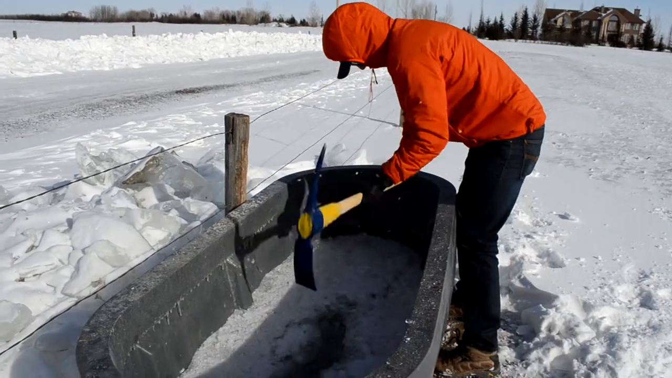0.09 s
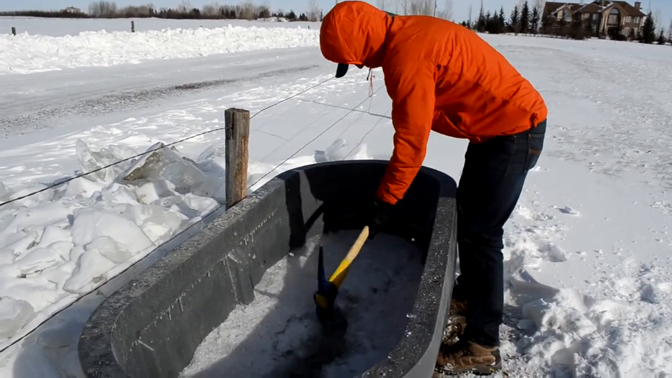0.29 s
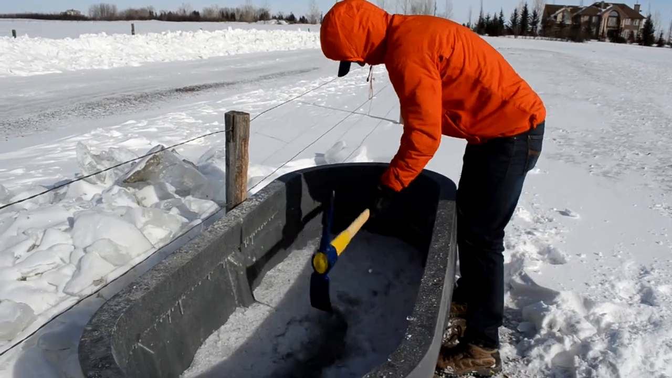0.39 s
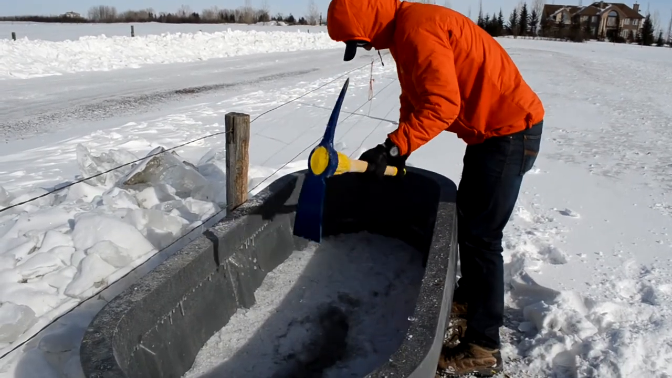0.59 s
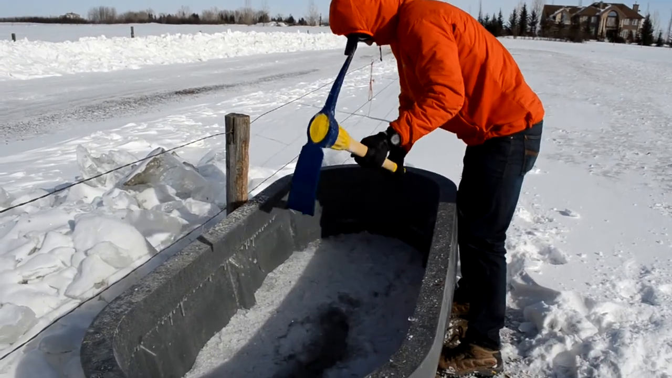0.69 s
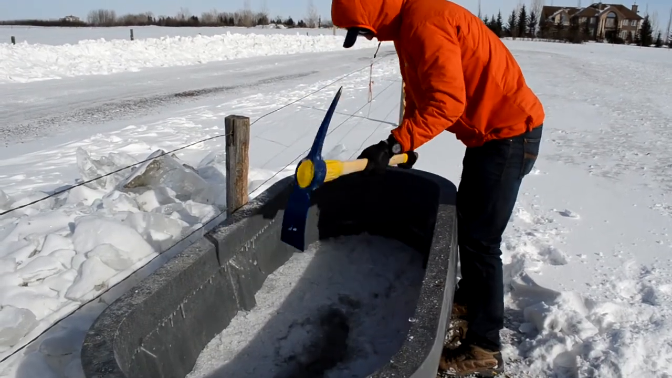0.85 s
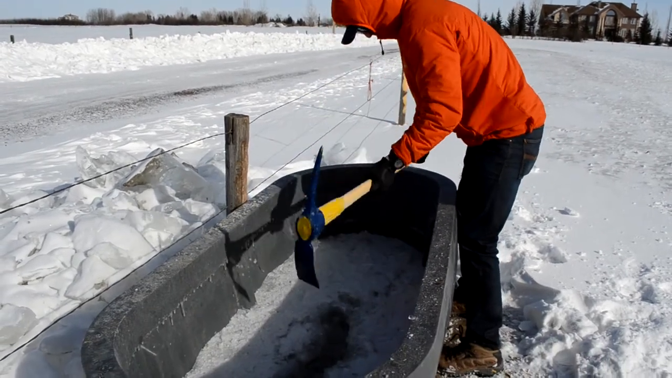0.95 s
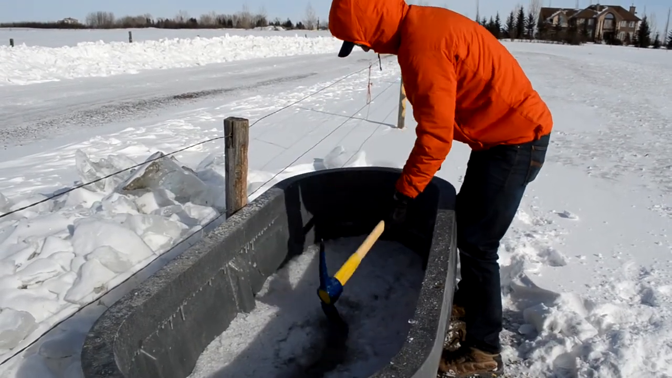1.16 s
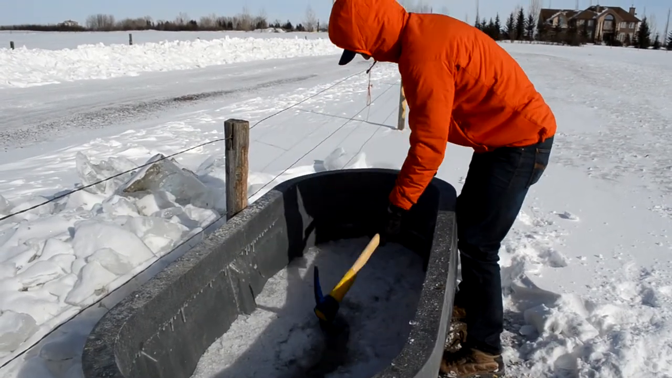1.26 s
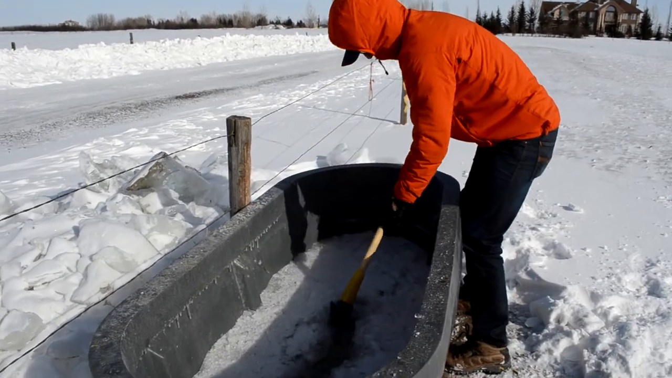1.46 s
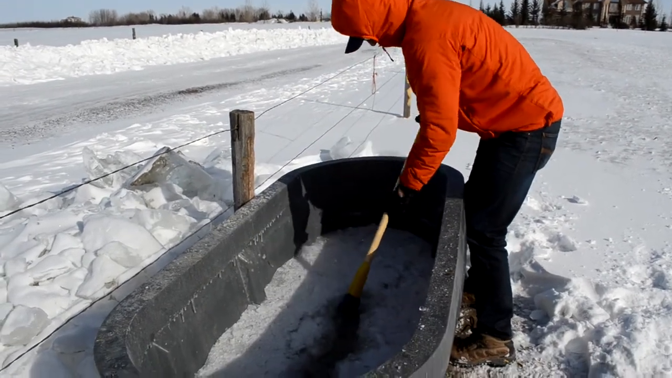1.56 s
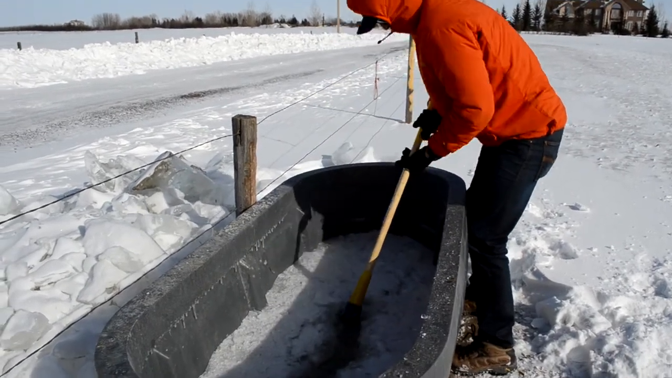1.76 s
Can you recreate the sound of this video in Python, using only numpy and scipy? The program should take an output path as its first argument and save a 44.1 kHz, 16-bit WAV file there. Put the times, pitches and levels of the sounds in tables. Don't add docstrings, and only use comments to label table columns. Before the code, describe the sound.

Pickaxe blows crunch into ice in a plastic trough outdoors, chips scattering over faint wind

```python
import sys
import numpy as np
from scipy import signal
from scipy.fft import rfft, irfft
from scipy.io import wavfile
from scipy.ndimage import uniform_filter1d

SR = 44100
rng = np.random.default_rng(int(sys.argv[2]) if len(sys.argv) > 2 else 0)


def elevation(decibels):
    levels = np.asarray(decibels, float)
    return 10 ** (levels / 20)


def persist_wave(psi):
    counts = np.round(np.clip(psi, -1, 1) * 32767).astype(np.int16)
    wavfile.write(sys.argv[1], SR, np.atleast_2d(counts).T)


N = 79380

# [f/Hz, level/dB, t60/s]
SLABS = [
    [(283, -7.5, 0.13), (515, -11, 0.11), (700, -20, 0.057), (1390, 5.5, 0.016), (1582, 0, 0.061),
     (2090, -14, 0.0077), (2554, 1.5, 0.016)],
    [(252, 12.5, 0.036), (387, -8.5, 0.014), (636, -1, 0.043), (1017, 0, 0.06), (1450, 0, 0.036),
     (1860, -12, 0.044), (2400, -28, .04)],
    [(218, -6, 0.11), (1020, -32, 0.074), (1210, 7.5, 0.017), (1300, -6.5, 0.02), (1710, -41, 0.04),
     (2546, -11, 0.047), (3310, -12.5, 0.035), (4200, -19, 0.018)],
]
# [f/Hz, density/dB per Hz]
CRACK_SPECTRUM = [(420, -24), (600, 0), (1350, 3), (2600, -15), (4000, -22.5), (8000, -31.5), (15500, -63)]
# [f/Hz, density/dB per Hz]
TICK_SPECTRUM = [(1500, -38), (3300, -2), (5000, -1), (7000, 2.5), (10000, -7), (15500, -22)]
LEAD_S = 0.01


def level(x, db):
    return x * elevation(db) / np.sqrt(np.mean(x ** 2))


def colour(x, points):
    p = np.array(points, float)
    hz = np.arange(4097) * SR / 8192 + 1
    db = np.interp(np.log(hz), np.log(p[:, 0]), p[:, 1], left=p[0, 1] - 20)
    cepstrum = irfft(db * np.log(10) / 20)
    cepstrum[1:4096] *= 2
    cepstrum[4097:] = 0
    response = irfft(np.exp(rfft(cepstrum)))
    return signal.fftconvolve(x, response)[:len(x)]


def ring(x, hz, db, t60):
    radius = np.exp(-np.log(1000) / (max(t60, 0.002) * SR))
    angle = 2 * np.pi * hz / SR
    poles = [1, -2 * radius * np.cos(angle), radius * radius]
    return elevation(db) * signal.lfilter([radius / 2, 0, -radius / 2], poles, x)


def walk(rate):
    k = int(SR / rate)
    steps = np.repeat(rng.standard_normal(N // k + 1), k)
    wander = uniform_filter1d(uniform_filter1d(steps, k), k)[:N]
    return wander / wander.std()


def crush(rise, decay, spread_db, size=8192):
    t = np.arange(size) / SR - LEAD_S
    swell = np.exp(np.minimum(t, 0) / max(rise, 1e-4))
    fade = np.exp(-np.maximum(t, 0) / max(decay, 2e-4))
    uneven = elevation(spread_db * rng.exponential(size=size))
    x = rng.standard_normal(size) * uneven * np.where(t < 0, swell, fade)
    x[int(LEAD_S * SR)] += 1.77 * elevation(spread_db)
    return x


def soft(x, hz):
    blunt = signal.butter(3, min(hz, 9000), fs=SR, output="sos")
    no_push = signal.butter(2, 170, "high", fs=SR, output="sos")
    return signal.sosfilt(np.vstack([blunt, no_push]), x)


def slab_ring(push, slab):
    longest_s = 0.055
    return sum(ring(push, hz, db, min(t60, longest_s)) for hz, db, t60 in slab)


def add(out, s, x, db):
    i = int((s - LEAD_S) * SR)
    k = min(len(x), N - i)
    out[i:i + k] += x[:k] * elevation(db) / np.abs(x).max()


def wind():
    # [f/Hz, density/dB per Hz]
    rumble = [(12, -104), (20, -16), (97, 0.5), (189, -6.5), (315, -15), (341, -18), (381, -16), (440, -19),
              (900, -35), (1170, -36.5), (1980, -120)]
    # [t/s, level/dB]
    gust = [(0, -41), (.13, -37.5), (.3, -35), (.43, -35.5), (.75, -38.5), (.87, -31), (.93, -40),
            (1.02, -35.5), (1.15, -37), (1.58, -30.5), (1.8, -35.5)]
    # [f/Hz, density/dB per Hz]
    air = [(300, -12.5), (600, 16), (1500, -13), (3000, -11), (8000, -59), (15000, -52)]
    gust_s, gust_db = np.array(gust).T
    x = rng.standard_normal(N)
    puffs = level(colour(x * elevation(2.65 * walk(24.9)), rumble), 1.23)
    hiss = level(colour(rng.standard_normal(N), air), -64)
    return puffs * elevation(np.interp(np.arange(N) / SR, gust_s, gust_db)) + hiss


def slush():
    # [t/s, dull level/dB, bright level/dB]
    slide = [(0, -55, -62), (0.178, -50, -57), (.25, -71, -67), (.3, -46, -52.5), (0.368, -35, -46),
             (0.441, -49.5, -53.5), (.53, -50, -57.5), (.62, -54, -58), (.75, -52.5, -65),
             (1.152, -56, -67.5), (1.24, -42.5, -66), (1.361, -47, -60.5), (1.45, -39.5, -53.5),
             (1.52, -42, -62.5), (1.62, -47, -60), (1.682, -49, -56.5), (1.8, -50.5, -52)]
    # [f/Hz, density/dB per Hz]
    dull = [(300, -20), (600, 9), (1000, 5), (1450, 8.5), (2500, -2), (5000, -34.5)]
    # [f/Hz, density/dB per Hz]
    bright = [(1500, 7.5), (3300, 7), (5000, -2), (7000, -5), (11000, -15), (15500, -24)]
    crumbs_per_s, rattle_db = 3100, 2.2
    t, out = np.arange(N) / SR, 0
    slide_s, dull_db, bright_db = np.array(slide).T
    rattle = walk(220)
    for spectrum, db, patchy_db in ((dull, dull_db, 2.0), (bright, bright_db, 1.5)):
        hit = rng.random(N) < crumbs_per_s / SR
        grains = hit * elevation(2.2 * rng.exponential(size=N)) + 0.84
        x = rng.standard_normal(N) * grains
        flow_db = np.interp(t, slide_s, db) + patchy_db * walk(39.22) + rattle_db * rattle
        out = out + level(colour(x, spectrum), 0) * elevation(flow_db)
    return out


def scrapes():
    # [t/s, length/s, level/dB]
    drags = [
        (1.491, 0.026, -26.5),
        (1.599, 0.026, -35.5),
    ]
    t, swell = np.arange(N) / SR, 0
    x = soft(rng.standard_normal(N) * elevation(3 * walk(200)), 2200)
    plate = level(ring(x, 1420, 0, 0.025) + ring(x, 860, 0, 0.023), 0)
    for s, length, db in drags:
        u = (t - s) / length
        rise = np.clip(np.minimum(0.4 + 0.6 * u, 1), 0, 1) * (u > 0)
        swell = swell + elevation(db) * rise * np.exp(-np.maximum(u - 1, 0) * 5)
    return plate * swell


def pieces(rows, t60, trough_db, crunch_db):
    # [f/Hz, level/dB, t60/s]
    trough = [(243, 4, 0.023), (614, -10.5, 0.058), (1400, 0, 0.007)]
    small_hz = 2100
    out = np.zeros(N)
    for s, db, hz, treble_db, tumble in rows:
        x = crush(0.00028, tumble, 0.73, size=4096)
        push = soft(x, 1.39 * hz)
        own = ring(push, hz, 0, t60 * min(1, small_hz / hz) ** 2 * max(1, 1100 / hz))
        overtone_db = -6 - 40 * (hz > small_hz)
        own = own + ring(push, rng.uniform(2.05, 2.3) * hz, overtone_db, t60 * 600 / hz)
        walls = sum(ring(push, *mode) for mode in trough)
        add(out, s, own + elevation(trough_db) * walls, db)
        crunch = soft(soft(x, 2.2 * hz), 2.2 * hz)
        add(out, s, ring(crunch, 1.206 * hz, 0, 0.002), db + crunch_db)
        add(out, s, colour(x, TICK_SPECTRUM), db + treble_db - 4.5)
    return out


def chips():
    # [t/s, level/dB, f/Hz, treble/dB]
    ticks = [(0.0133, -46, 760, -14), (0.029, -43.5, 1040, 4), (0.045, -41.5, 1220, 1),
             (0.0706, -44.5, 680, 9.5), (0.0849, -44, 845, -18), (0.1185, -53, 662, -21),
             (0.135, -37, 1520, -2.5), (0.1727, -31, 1640, -4), (0.3249, -28.5, 786, -7),
             (0.3321, -36, 1420, 0), (0.3752, -28.5, 880, -13), (0.4111, -33, 1150, -6),
             (0.419, -32.5, 1280, -3), (0.4316, -37, 1400, -4), (0.4392, -36, 1260, -5),
             (0.5545, -38, 1180, 2.5), (0.59, -39.5, 1660, 1.5), (0.655, -46, 1400, -25),
             (0.695, -39, 1580, -38), (0.7824, -34, 797, -10.5), (1.0888, -40.5, 820, -16),
             (1.2608, -35, 1510, -29), (1.272, -38.5, 2300, -21), (1.342, -36, 2360, -22),
             (1.3286, -33, 1100, -38), (1.3774, -35.5, 770, -10.5), (1.7295, -34.5, 646, -17)]
    tumble_s = 0.002
    return pieces([(*row, tumble_s) for row in ticks], 0.0082, -9.0, -3.0)


def lumps():
    # [t/s, level/dB, f/Hz, treble/dB, tumble/s]
    knocks = [(0.2885, -25, 1590, -43, 0.0024), (0.3495, -16, 1490, -14, 0.0052),
              (0.354, -18, 1580, -12, 0.0043), (0.364, -31, 1080, -7, 0.007),
              (0.385, -20.5, 694, -10, 0.0047), (0.463, -21.5, 1530, -24, 0.0051),
              (0.4675, -16.5, 1215, -12, 0.0067), (0.474, -17.5, 1250, -12, 0.0025),
              (0.487, -26.5, 870, -20, 0.0078), (0.514, -33.5, 1090, -10, 0.005),
              (0.94, -23.5, 574, -29, 0.0016), (1.078, -26.5, 740, -26, 0.0008),
              (1.095, -34, 860, -31, 0.0036), (1.3035, -21.5, 2130, -47, 0.0043),
              (1.305, -21, 1050, -42, 0.0067), (1.41, -29, 1390, -16.5, 0.0051),
              (1.4335, -24.5, 3320, -7.5, 0.0017), (1.443, -26.5, 1390, -32, 0.0045),
              (1.45, -29, 1540, -23, 0.0026), (1.465, -13.5, 1400, -19.5, 0.0066),
              (1.468, -17.5, 796, -20, 0.0074), (1.478, -16, 840, -39, 0.006),
              (1.487, -25.5, 1400, -20, 0.0036), (1.5, -20.5, 1310, -33, 0.0044),
              (1.508, -37, 1400, -17, 0.0018), (1.515, -17, 1410, -42, 0.0027),
              (1.526, -31, 1500, -26, 0.0046), (1.535, -39, 1290, -30, 0.00098),
              (1.546, -35.5, 1330, -23, 0.005), (1.558, -32, 1510, -28, 0.0071),
              (1.571, -44, 1400, -26, 0.005), (1.594, -33.5, 1700, -19, 0.0056),
              (1.611, -30, 1390, -20, 0.0063), (1.628, -33, 1450, -25, 0.005),
              (1.654, -40.5, 1580, -15, 0.006),
              (1.1765, -22.5, 777, -31, 0.0019),
        (1.185, -31.5, 2100, -6.5, 0.023),
    ]
    return pieces(knocks, 0.0084, -12.0, -11.5)


def fractures():
    # [t/s, level/dB, crack/dB relative to level]
    splits = [
        [(.2048, -1, -7), (.2093, -3, -5.5), (.2135, -18, 0), (.217, -12.5, 1), (.2275, -23, 9)],
        [(.2415, -6.5, -23), (.2465, -19, -10)],
        [(1.1985, -15, 3.5), (1.2015, -8.5, -10.5), (1.2045, -1, -7.5), (1.2095, -10, -8.5), (1.2165, -15, -13),
         (1.2225, -17, -5)],
    ]
    decay_s = 0.0009
    out = np.zeros(N)
    for rows, slab in zip(splits, SLABS):
        for s, db, crack_db in rows:
            push = soft(crush(0.0003, decay_s, 1.0), 3200)
            add(out, s, slab_ring(push, slab), db)
            add(out, s, colour(crush(0.00024, 3 * decay_s, 0.48), CRACK_SPECTRUM), db + crack_db)
    return out


def blows():
    # [t/s, level/dB, crush rise/s, crush decay/s, crack/dB relative to level]
    swings = [
        (0.2041, -12.5, 0.0016, 0.011, 0),
        (0.2353, -2.5, 0.00092, 0.0021, 0.5),
        (1.2, -8.5, 0.00041, 0.0072, -5),
    ]
    snaps = (-23, -48, -24)
    # [t/s, level/dB, f/Hz, t60/s]
    steel = [
        (.204, -30.5, 9340, 0.0084),
        (1.226, -56, 10500, 0.037),
        (1.329, -53.5, 6760, .008),
    ]
    out = np.zeros(N)
    for (s, db, rise, decay, crack_db), slab, snap_db in zip(swings, SLABS, snaps):
        push = soft(crush(rise, decay, 2.3), 3250)
        add(out, s, slab_ring(push, slab), db)
        add(out, s, colour(crush(1.23 * rise, 2.0 * decay, 1.6), CRACK_SPECTRUM), db + crack_db)
        add(out, s, colour(crush(rise, 0.0031, 0.68), TICK_SPECTRUM), snap_db)
    for s, db, hz, t60 in steel:
        tap = crush(0.00065, 0.0013, 2.0)
        add(out, s, ring(ring(tap, hz, 0, t60), hz, 0, 0.0053), db)
    return out


def trough_echo(ice):
    echo_db, echo_t60_s = -19.5, 0.16
    t = np.arange(SR // 2) / SR
    tail = signal.lfilter([1], [1, -0.8], rng.standard_normal(len(t))) * elevation(-60 * t / echo_t60_s)
    return elevation(echo_db) * signal.fftconvolve(ice, tail / np.sqrt(np.sum(tail ** 2)))[:N]


def scene():
    ice = chips() + lumps() + fractures() + blows()
    return (wind() + slush() + scrapes() + ice + trough_echo(ice))[None]


def band_limit(x):
    return signal.sosfilt(signal.butter(12, 16060, fs=SR, output="sos"), x)


def record(dry):
    dull = signal.sosfilt(signal.butter(2, 12000, fs=SR, output="sos"), dry)
    limited = dull / (1 + np.abs(dull) ** 8) ** 0.12
    return band_limit(limited)


dry = scene()
out = record(dry)
persist_wave(out)
```